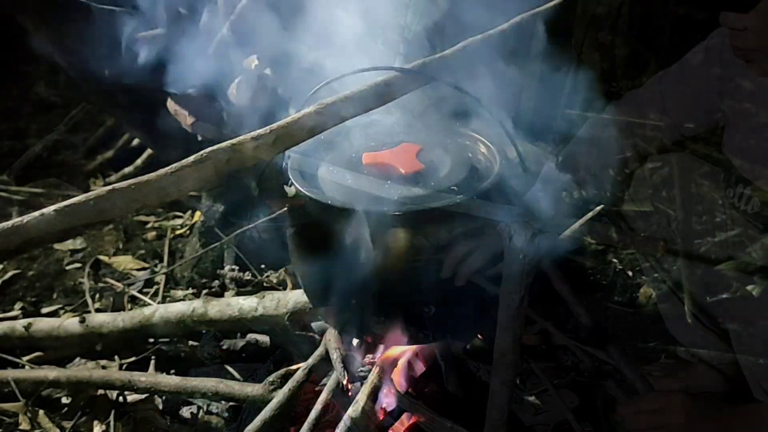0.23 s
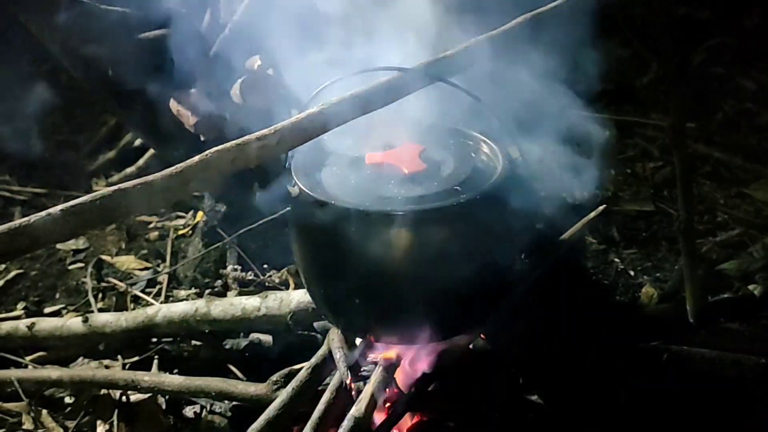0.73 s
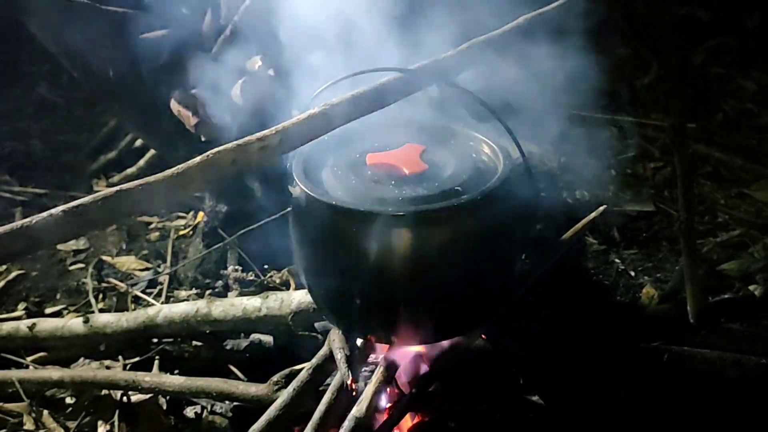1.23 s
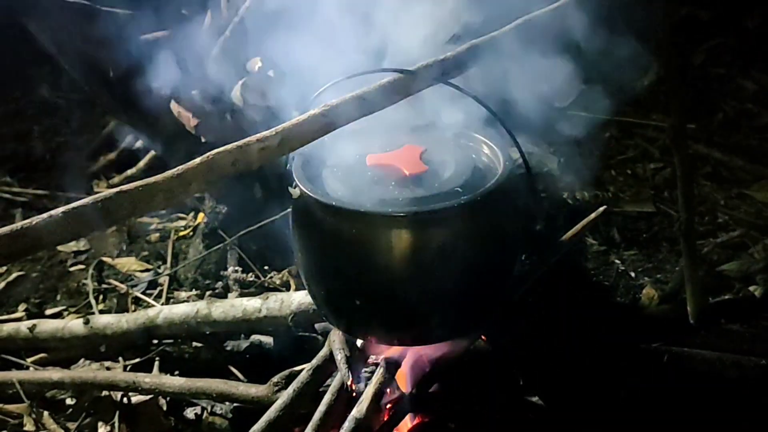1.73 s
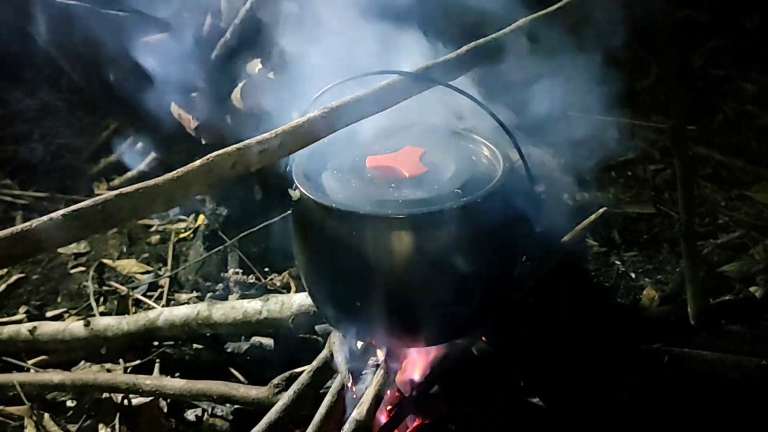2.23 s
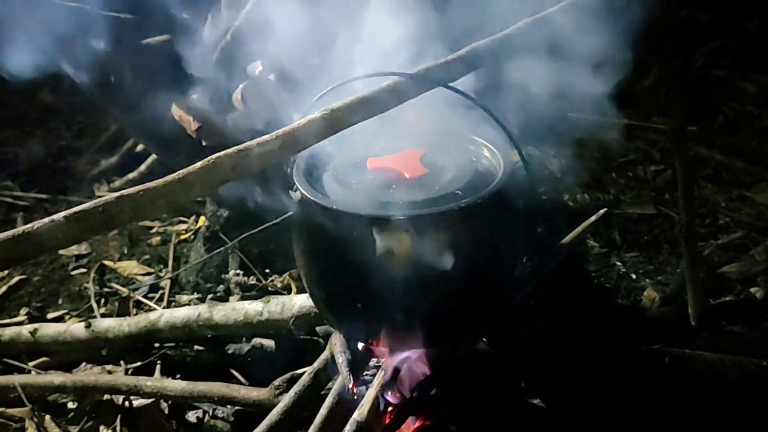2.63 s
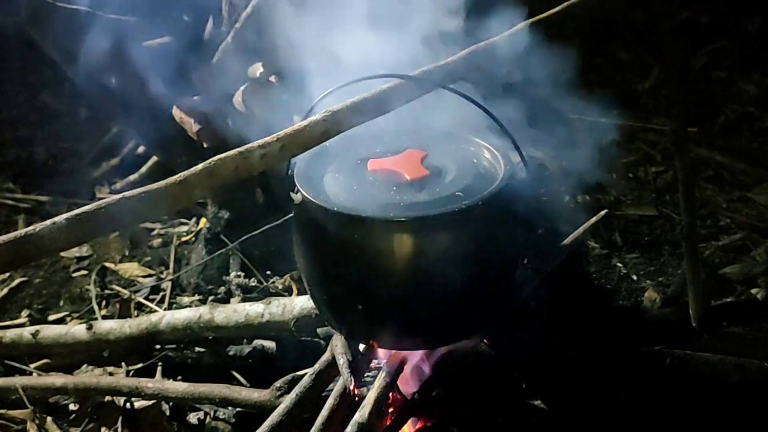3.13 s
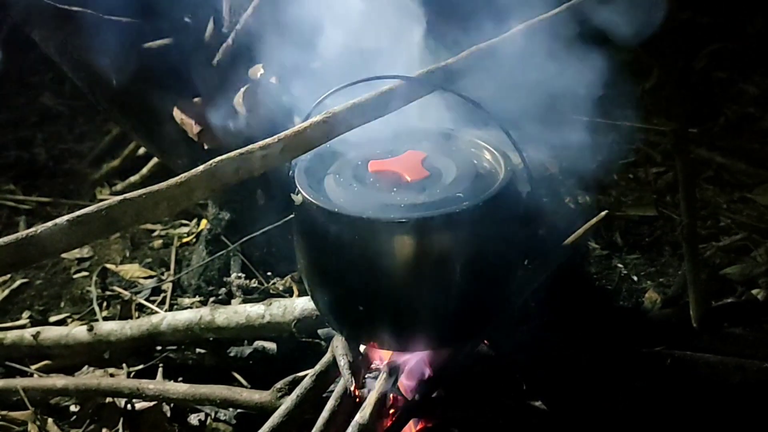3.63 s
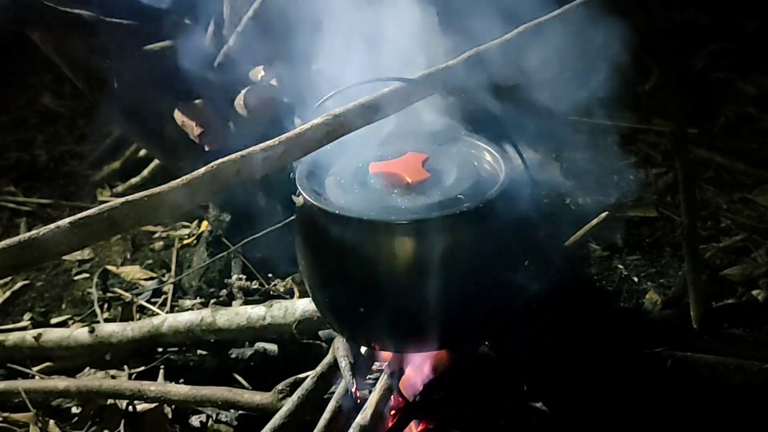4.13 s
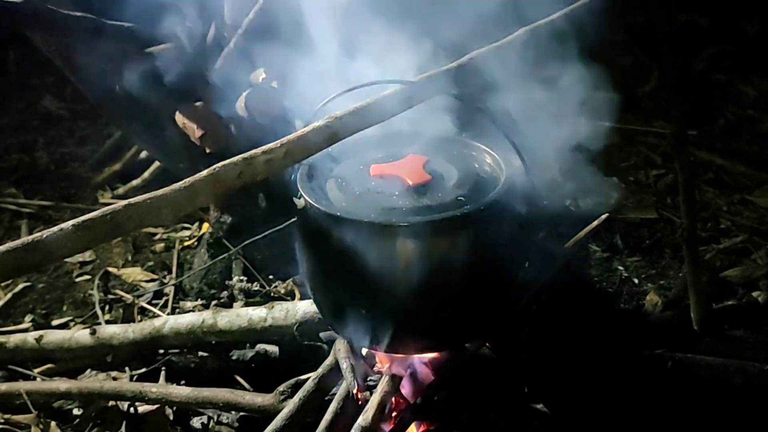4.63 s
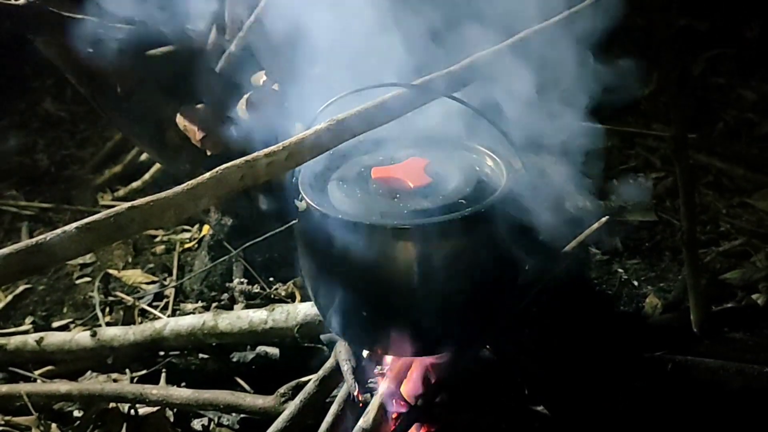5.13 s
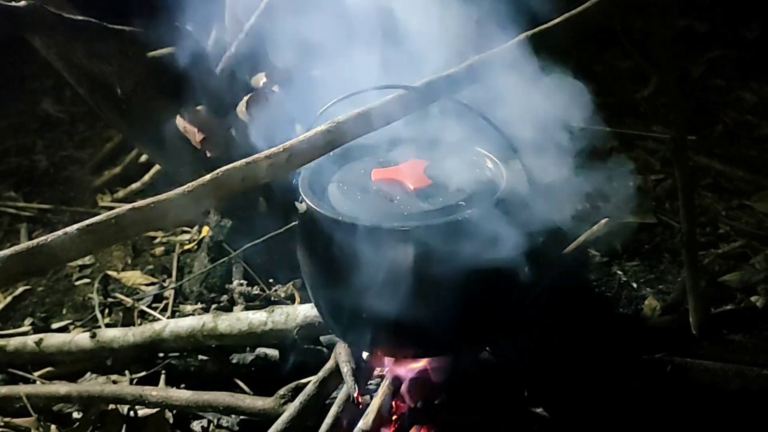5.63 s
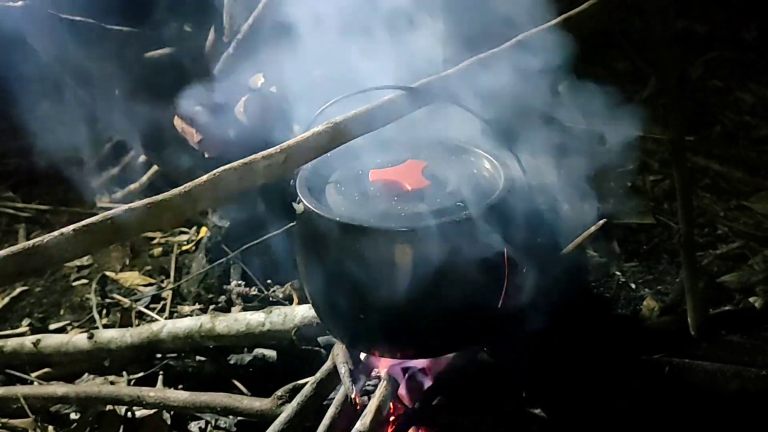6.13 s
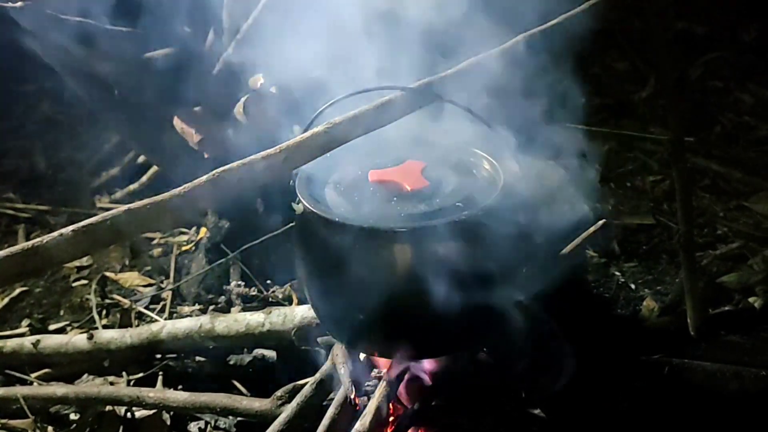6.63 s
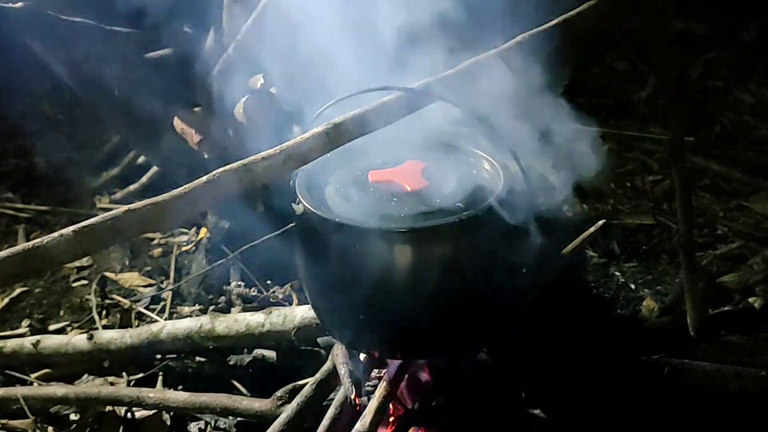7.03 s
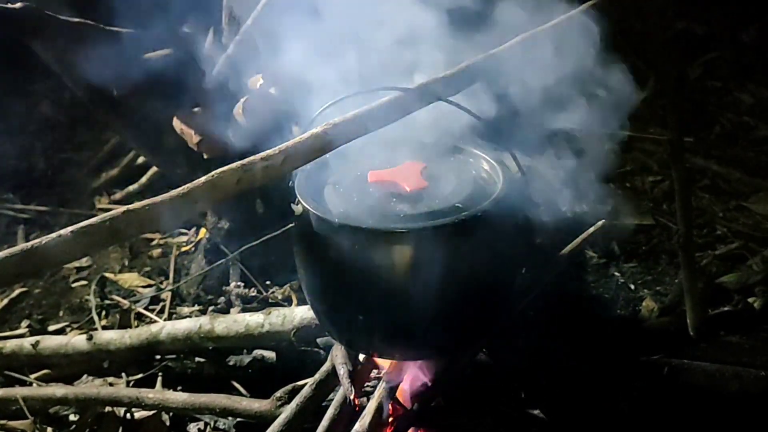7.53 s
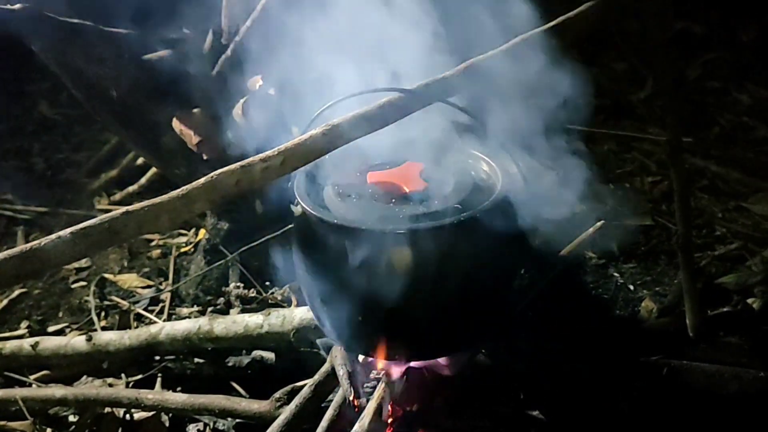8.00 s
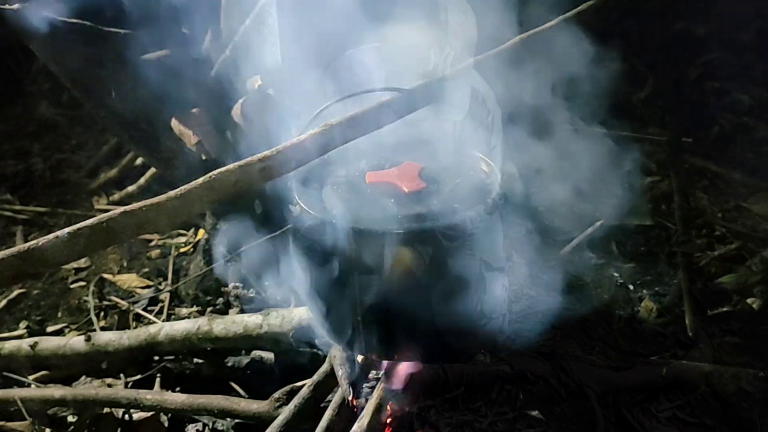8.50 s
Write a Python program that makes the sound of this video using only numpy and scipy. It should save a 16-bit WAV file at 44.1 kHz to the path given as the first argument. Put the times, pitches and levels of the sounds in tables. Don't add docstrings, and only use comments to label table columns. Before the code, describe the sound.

Night in a tropical forest, heard from close beside a simmering pot. A steady high insect band and a pulsing cricket trill run throughout with faint fast ticking and soft double frog clucks. From about 2.5 to 4 seconds a very near cricket throws loud, piercing, downward-swooping chirps in quick pairs and triplets. The pot rumbles, hisses and hums low under its lid. The image is nearly mono, with a short leafy echo.

```python
import sys
import numpy as np
from scipy import signal
from scipy.fft import rfft, irfft, next_fast_len
from scipy.io import wavfile
from scipy.ndimage import map_coordinates

SR = 44100
rng = np.random.default_rng(int(sys.argv[2]) if len(sys.argv) > 2 else 0)


def invert_db(x):
    u = np.asarray(x, float) / 20
    return 10 ** u


def dump_mix(stems):
    frames = np.atleast_2d(stems).T
    limited = np.clip(frames, -1, 1)
    pcm = np.round(limited * 32767).astype(np.int16)
    wavfile.write(sys.argv[1], SR, pcm)


N = 386316

# start in seconds, peak in dB, starting pitch in Hz.
NEAR_CHIRPS = [(2.52, -29, 5050), (2.5668, -18.5, 5140), (2.6096, -11.5, 5300), (2.7797, -12, 5290),
               (2.8292, -9, 5410), (2.997, -9.5, 5360), (3.0384, -8.6, 5390), (3.0841, -8.5, 5420),
               (3.2543, -9.5, 5375), (3.2973, -8.5, 5400), (3.4659, -9, 5370), (3.5086, -8.5, 5405),
               (3.6756, -9, 5356), (3.7191, -8.5, 5385), (3.9408, -9, 5370), (3.9833, -9, 5380)]
# time in ms, width in ms, depth from 0 to 1.
NEAR_SWELL = [(0, -26), (5.5, -2.5), (10, 0), (20, -2.5), (23, -10), (26.5, -30)], [(13.3, .8, .4),
              (17, 1.7, .8), (22.3, .8, .75)]
# first stroke in seconds, last stroke in seconds, level in dB.
TRILL_PHRASES = [(0.079, 0.457, -32.5), (0.51, 0.835, -32), (0.889, 1.21, -31.5), (1.265, 1.641, -31.5),
                 (1.695, 2.072, -31.5), (2.125, 2.451, -31), (3.163, 3.215, -34), (3.27, 3.324, -32.5),
                 (3.597, 3.646, -31), (3.701, 3.755, -33.5), (3.808, 3.914, -31), (4.021, 4.021, -29),
                 (4.075, 4.454, -31), (4.714, 5.196, -31.5), (5.251, 5.734, -31.5), (5.95, 6.327, -32.5),
                 (6.38, 6.702, -31.5), (6.756, 7.135, -32), (7.188, 7.564, -31.5), (7.617, 7.94, -31),
                 (7.993, 8.369, -31.5), (8.174, 8.174, -39), (8.227, 8.336, -39), (8.39, 8.714, -34)]
# time in ms, width in ms, depth from 0 to 1.
TRILL_SWELL = [(0, -34), (1.5, -13), (4.5, -5), (7.5, -1), (12.5, 0), (25.5, -4.5), (33, -10), (46, -14),
               (54, -40)], [(20.6, 2.8, .7), (29.2, 1.3, .65)]
# first stroke in seconds, last stroke in seconds, level in dB.
ANSWERS = [(.01, .055, -40.5), (.127, .17, -35.5), (.255, .298, -43.5), (.45, .497, -43),
           (4.215, 4.305, -39), (4.47, 4.47, -47), (4.69, 4.735, -43), (4.78, 4.82, -39), (4.91, 4.91, -44),
           (4.95, 4.99, -37.5), (5.187, 5.228, -37), (5.375, 5.375, -45), (5.418, 5.46, -34),
           (5.658, 5.70, -35), (5.85, 5.85, -45), (5.885, 5.928, -34), (6.115, 6.157, -48)]
# first group in seconds, last group in seconds, level in dB.
TICK_RUNS = [(.042, .916, -47.5), (1.028, 3.474, -47.5), (3.583, 4.126, -49), (4.237, 5.807, -47.5),
             (5.918, 7.031, -47.5), (7.138, 7.355, -48), (7.471, 8.364, -48), (8.484, 8.707, -48.5)]
# lag in seconds, level in dB.
TICK_GROUP = [
    (-.017, -1.5),
    (0, 4),
    (0.0154, 2),
    (.029, -2.5),
]
# start in seconds, level in dB.
CLUCKS = [(.02, -46), (.09, -44), (1.096, -46), (1.165, -41.5), (2.015, -47), (2.085, -43), (3.15, -52),
          (3.225, -43), (3.297, -43), (4.4, -50), (4.47, -44), (5.339, -47.5), (5.415, -44), (5.485, -46),
          (6.441, -47), (6.51, -43), (7.265, -47), (7.333, -42.5), (8.151, -53)]
# time in seconds, level in dB.
BOIL = [(0, -62), (3.1, -62.5), (5.6, -61), (6.2, -60), (7, -60.5), (7.55, -59.5), (8.3, -61.5),
        (8.76, -64)]
# start in seconds, length in seconds, level in dB, pitch in Hz.
LID_PUFFS = [(.06, .1, -52.5, 164), (.179, 0.14, -46.5, 163), (.384, .2, -50, 166), (.6, .22, -42, 168),
             (.937, 0.13, -47.5, 164), (1.122, 0.099, -46.5, 158), (1.384, 0.088, -47.5, 157),
             (1.8, 0.17, -52, 82), (1.82, .1, -46.5, 164), (1.85, .15, -59, 375), (1.94, 0.18, -44.5, 165),
             (2.372, .15, -51, 174), (2.569, 0.13, -53.5, 165), (2.904, 0.064, -49.5, 144),
             (3.108, .066, -52.5, 155), (3.228, .12, -50, 152), (3.399, .056, -50, 152),
             (3.62, 0.16, -48.5, 163), (3.82, 0.085, -48.5, 157), (4.066, 0.27, -52, 163),
             (4.28, 0.42, -53.5, 163), (5.648, 0.12, -55, 175), (7.28, .16, -52, 137),
             (7.4, 0.62, -58, 332), (7.472, 0.2, -47.5, 139), (7.725, 0.046, -48.5, 136),
             (7.72, 0.49, -60.5, 412), (7.837, 0.042, -50, 142), (7.973, .052, -47.5, 142),
             (8.29, 0.22, -55, 146)]
# start in seconds, level in dB, pitch in Hz.
BUBBLES = [
    (.868, -39, 290),
    (0.47, -46, 224),
    (2.3, -49, 380),
    (6.4, -53, 266),
    (8.72, -45, 50),
    (8.53, -46, 99),
    (8.74, -57, 1800),
    (4.535, -54, 1450),
]
# start in seconds, level in dB,
# decay in seconds.
LEAVES = [
    (4.513, -44, 0.0055),
    (4.53, -45, 0.022),
    (4.547, -50, .005),
    (4.566, -45, .008),
    (5.62, -46.5, 0.046),
    (5.6, -53, .005),
    (8.381, -41, .0008),
]
# start in seconds, level in dB, decay in seconds.
POP = (8.2772, -23, .0033)
# time in seconds, effort in dB.
LOW_CHORUS = [(.56, -47.5), (.85, -44), (1.75, -45.5), (2.17, -43.5), (2.68, -50), (3.24, -50),
              (3.66, -42.5), (4.07, -48.5), (4.42, -44), (5.3, -47), (5.7, -43.5), (6.93, -52),
              (7.05, -45.5), (7.4, -43), (7.75, -50), (8.34, -42.5), (8.4, -50.5), (8.76, -45)]
# pitch in Hz, level in dB.
KATYDID_WHINES = [(12387, -79), (12683, -81), (13108, -81), (13291, -79), (13324, -81), (13566, -78),
                  (13625, -79), (13701, -81), (13776, -80), (13851, -81), (14023, -79), (14492, -85)]
# frequency in Hz, density in dB per Hz.
KATYDID_SPECTRUM = [(10500, -30), (11600, -5.5), (12500, 1), (13800, 2.5), (14600, -5.5), (15500, -4)]
# frequency in Hz, density in dB per Hz.
RUMBLE_SPECTRUM = [(12, -18), (20, -7), (87, -1), (149, -1.5), (183, 1), (222, -5.5), (305, -5), (900, -22),
                   (1170, -22), (1980, -120)]
# frequency in Hz, density in dB per Hz.
STEAM_SPECTRUM = [(200, -14), (500, -4.5), (1200, -5.5), (2000, -9.5), (2700, -9.5), (4200, -10.5),
                  (5200, 2.5), (7400, -5), (8200, -19), (9600, -7.5), (11200, -16), (15000, -26)]
# delay in seconds, level in dB.
TRUNKS = [(.0085, -2.5), (.0135, -28.5), (.021, -11.5), (.034, -17)]
# time in seconds, level in dB.
OVERLAP = [
    (7.6, 1.5),
    (8.381, 3),
    (8.384, -3),
    (8.76, 0),
]

TRILL_SPACING_S, ANSWER_SPACING_S, TICK_SPACING_S = .0538, .043, .111
LOW_HZ, LOW_HZ_PER_DB = 3447, 11
CRICKETS_DB, KATYDIDS_DB, TOADS_DB = -48, -61, -67.5
RUMBLE_DB, RUMBLE_FOLLOWS = -51.5, 0.12
PUFF_EDGE_S, PUFF_LATE = 0.0402, 1.05


def unit(x):
    return x / np.sqrt(np.mean(x ** 2) + 1e-20)


def curve(rows):
    s, db = np.transpose(rows)
    return np.interp(np.arange(N) / SR, s, db)


def wobble(rate):
    return map_coordinates(rng.standard_normal(int(N * rate / SR) + 4), [np.arange(N) * rate / SR])


def noise(spectrum):
    m = next_fast_len(N)
    f, db = np.transpose(spectrum)
    gain = invert_db(np.interp(np.log(np.fft.rfftfreq(m, 1 / SR) + 1), np.log(f), db, -120, -120))
    return unit(irfft(rfft(rng.standard_normal(m)) * gain, m)[:N])


def add(track, s, sound):
    i = max(round(s * SR), 0)
    track[i:i + len(sound)] += sound[:max(len(track) - i, 0)]


def evenly(runs, spacing):
    beats = []
    for first, last, db in runs:
        count = round((last - first) / spacing) + 1
        beats += [(s, db) for s in np.linspace(first, last, count)]
    return beats


def stroke(top_hz, fall_hz, length, bend, skew, overtones_db=(), swell=None):
    u = np.linspace(0, 1, max(round(length * SR), 8))
    hz = top_hz - fall_hz * u ** bend
    phase = 2 * np.pi * np.cumsum(hz) / SR + rng.uniform(0, 2 * np.pi)
    arch = np.sin(np.pi * u ** skew)
    overtones = sum(invert_db(db) * np.sin((k + 2) * phase) for k, db in enumerate(overtones_db))
    if swell is None:
        return arch * (np.sin(phase) + overtones)
    levels, dips = swell
    ms, db = np.transpose(levels)
    loudness = np.interp(u, ms / ms[-1], invert_db(db))
    for at, width, depth in dips:
        loudness *= 1 - depth * np.exp(-((u * ms[-1] - at) / width) ** 2)
    return loudness * np.sin(phase) + arch ** 1.3 * overtones


def forest(x, echo_db, tail_db, t60, direct_db=0, build=0.0075):
    out = invert_db(direct_db) * x
    for s, db in TRUNKS:
        add(out, s, invert_db(db + echo_db) * x)
    t = np.arange(SR // 3) / SR
    turn = np.pi * np.arange(N) / SR * 1.7
    for share in np.cos(turn), np.sin(turn):
        tail = rng.standard_normal(len(t)) * invert_db(-60 * t / t60) * (1 - np.exp(-t / build))
        out += invert_db(tail_db) * signal.fftconvolve(x * share, tail / np.linalg.norm(tail))[:N]
    return out


def near_cricket():
    out = np.zeros(N)
    for s, db, hz in NEAR_CHIRPS:
        length = .0265 * (1 + .025 * rng.standard_normal())
        chirp = stroke(hz + 20, hz - 4520, length, 1.95, .68, overtones_db=[-28.5, -35], swell=NEAR_SWELL)
        add(out, s, invert_db(db) * chirp)
        add(out, s - .007, invert_db(db - 23) * stroke(hz + 60, 100, .009, 1, 1.4))
        scrape = np.diff(rng.standard_normal(1301)) * np.hanning(1300)
        add(out, s - .02, invert_db(db - 49.5) * scrape)
        rough = rng.standard_normal(50).repeat(18)
        add(out, s - .022, invert_db(db - 41) * rough * stroke(8500, 200, 900 / SR, 1, 1))
    return forest(out, echo_db=-14, tail_db=-16.5, t60=.28)


def trilling_cricket():
    out = np.zeros(N)
    for s, db in evenly(TRILL_PHRASES, TRILL_SPACING_S):
        hz, gain_db, late, stretch = rng.standard_normal(4) * [4.3, 1.1, 0.0006, 0.015]
        length = .054 * (1 + stretch)
        sound = stroke(4836 + hz, 75, length, .9, .42, overtones_db=[-31.5], swell=TRILL_SWELL)
        add(out, s - .0115 + late, invert_db(db + 3.0 + gain_db) * sound)
    return forest(out, echo_db=-24, tail_db=-7.5, t60=.4, build=.025)


def answering_cricket():
    out = np.zeros(N)
    for s, db in evenly(ANSWERS, ANSWER_SPACING_S):
        add(out, s - .01, invert_db(db + 5) * stroke(5680, 1050, .024, 1.1, 1, overtones_db=[-24, -25]))
    return forest(out, echo_db=-12, tail_db=.1, t60=.16, direct_db=-15, build=.05)


def tree_cricket():
    out = np.zeros(N)
    for s, db in evenly(TICK_RUNS, TICK_SPACING_S):
        late, gain_db = rng.standard_normal(2) * [.0015, 1.1]
        for lag, tick_db in TICK_GROUP:
            tick = stroke(7384, 150, 0.0092, 1.1, 0.59)
            add(out, s + late + lag - .004, invert_db(db + gain_db + tick_db - 3) * tick)
    return forest(out, echo_db=-8.0, tail_db=-4.5, t60=0.27)


def frog():
    out = np.zeros(N)
    for s, db in CLUCKS:
        add(out, s, invert_db(db) * stroke(2880, 140, .012, 1.2, 1))
        add(out, s + .014, invert_db(db - 1) * stroke(2720, 130, .012, 1.2, 1))
        add(out, s + 0.039, invert_db(db - 10) * stroke(2990, 243, 0.016, 1.5, 0.36))
    return forest(out, echo_db=-6, tail_db=-3.5, t60=.33, direct_db=-2.5, build=.035)


def lid_and_bubbles():
    out = np.zeros(N)
    for s, length, db, hz in LID_PUFFS:
        puff = stroke(hz, 2.9, length + PUFF_EDGE_S, 0.96, PUFF_LATE)
        add(out, s - PUFF_EDGE_S / 2, invert_db(db + 2.0) * puff)
    out *= invert_db(2 * wobble(22))
    for s, db, hz in BUBBLES:
        add(out, s, invert_db(db) * stroke(hz, -.06 * hz, 0.027, 1.4, 0.31))
    return out


def small_noises():
    out, t = np.zeros(N), np.arange(SR // 8) / SR
    for s, db, length in LEAVES:
        add(out, s, invert_db(db) * rng.standard_normal(len(t)) * np.exp(-t / length))
    s, db, decay = POP
    add(out, s, invert_db(db) * np.exp(-t / decay) * (1 - np.exp(-t / .00014)))
    return out


def simmer():
    boil_db = curve(BOIL)
    rumble_db = RUMBLE_DB + RUMBLE_FOLLOWS * (boil_db - boil_db.mean()) + wobble(2.055)
    rumble = invert_db(rumble_db - 1.26 + 0.95 * wobble(9)) * noise(RUMBLE_SPECTRUM)
    steam = invert_db(boil_db + 7 + 0.92 * wobble(25)) * noise(STEAM_SPECTRUM)
    return rumble + steam


def chorus(centre_hz, spread_hz, rate, duty, count, loose=1.):
    out, t = np.zeros(N), np.arange(N) / SR
    cycles = np.cumsum(centre_hz + np.zeros(N)) / SR
    for k, (pitch, beat, start) in enumerate(rng.random((count, 3))):
        place = 2 * (k + pitch) / count - 1
        beats = rate * (1 + loose * (.6 * beat - .3)) * t + start
        slip = loose * rng.random(4000)[beats.astype(int)]
        gate = np.sin(np.pi * np.minimum(beats % 1 / duty, 1)) ** 2
        tone = np.sin(2 * np.pi * (cycles + loose * spread_hz * place * t + slip))
        out += invert_db(-11 * place ** 2) * gate * tone
    return unit(forest(out, echo_db=-2.5, tail_db=5.0, t60=0.3))


def low_crickets():
    low_db = curve(LOW_CHORUS)
    low_hz = LOW_HZ + LOW_HZ_PER_DB * (low_db - low_db.mean())
    buzzer = chorus(3476 + 6 * wobble(3), 1, rate=138, duty=0.9, count=1, loose=0)
    singers = chorus(low_hz + 20, 280, rate=26, duty=0.38, count=12)
    singers += 0.31 * chorus(low_hz - 250, 260, rate=22, duty=0.24, count=6)
    return invert_db(low_db - 0.27 + 0.45 * wobble(3.9)) * (singers + 0.33 * buzzer)


def high_crickets():
    singers = chorus(6380, 520, rate=40, duty=.2, count=14)
    singers += 0.54 * chorus(6300, 1000, rate=30, duty=0.17, count=8)
    return invert_db(CRICKETS_DB - 2.5 + .3 * wobble(1.95)) * singers


def toads():
    return invert_db(TOADS_DB + .7 * wobble(1.9)) * chorus(2280, 170, rate=14, duty=0.26, count=6)


def katydids():
    out = invert_db(KATYDIDS_DB - 3.0 + .6 * wobble(1.5) + .6 * wobble(40)) * noise(KATYDID_SPECTRUM)
    turns, drift = 2 * np.pi * np.arange(N) / SR, wobble(6)
    for k, (hz, db) in enumerate(KATYDID_WHINES):
        out += invert_db(db + 4.5) * np.sin(hz * turns + 4 * np.roll(drift, k * SR))
    return out


def scene():
    trill, chirps = trilling_cricket(), near_cricket() + answering_cricket()
    mid = trill + chirps + tree_cricket() + frog() + lid_and_bubbles() + small_noises() + low_crickets()
    background = simmer() + high_crickets() + toads() + katydids()
    mid += invert_db(curve(OVERLAP)) * background
    side = invert_db(-33.5) * trill + invert_db(-32) * chirps
    return np.array([mid - side, mid + side])


def top_cut(x):
    return signal.sosfilt(signal.butter(12, 16260, fs=SR, output="sos"), x)


def record(dry):
    m = next_fast_len(N)
    heard = np.fft.rfftfreq(m, 1 / SR) < 15620
    narrow = irfft(rfft(dry, m) * heard, m)[:, :N]
    return top_cut(narrow)


dry = scene()
out = record(dry)
dump_mix(out)
```